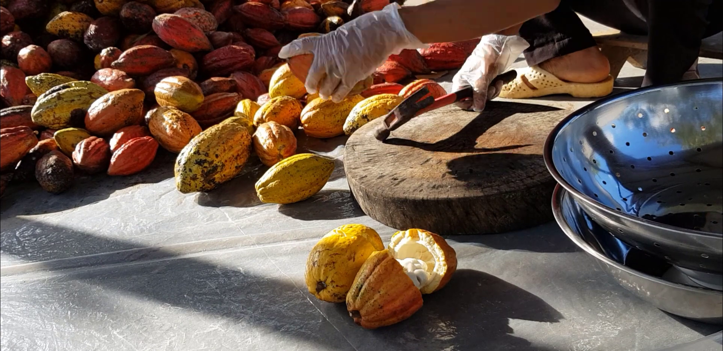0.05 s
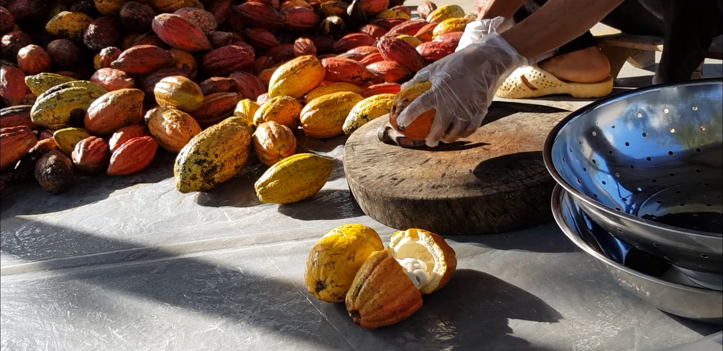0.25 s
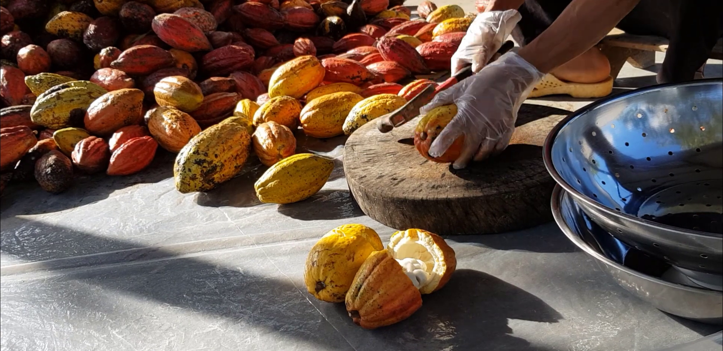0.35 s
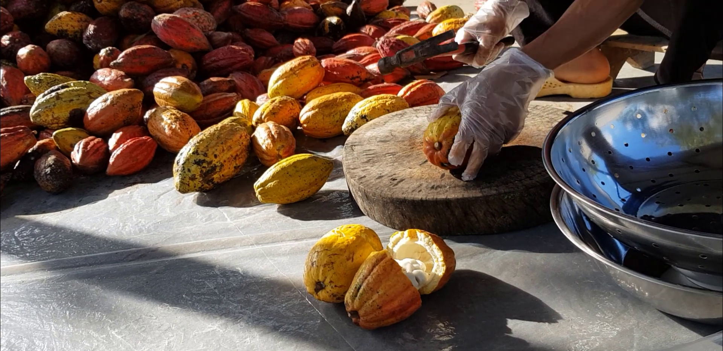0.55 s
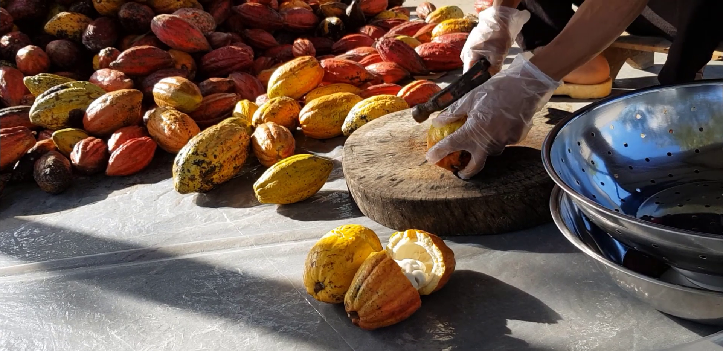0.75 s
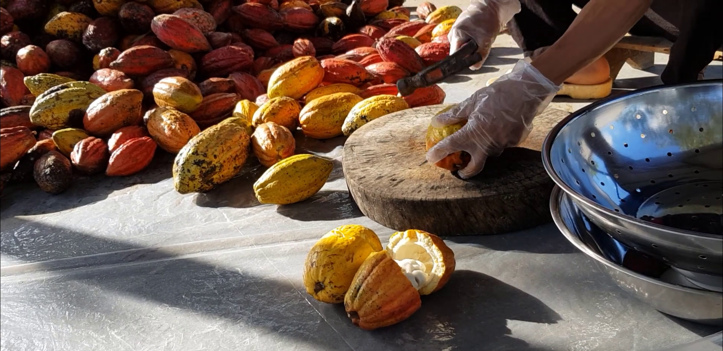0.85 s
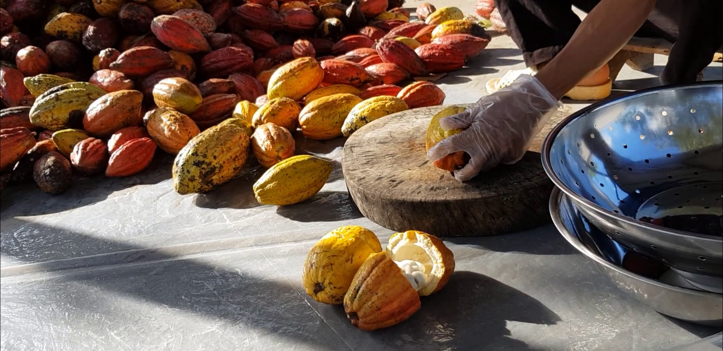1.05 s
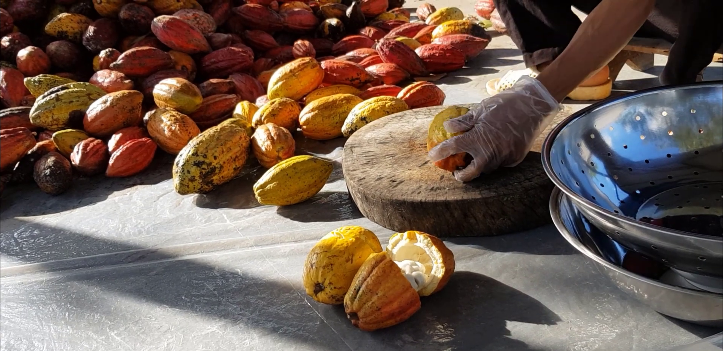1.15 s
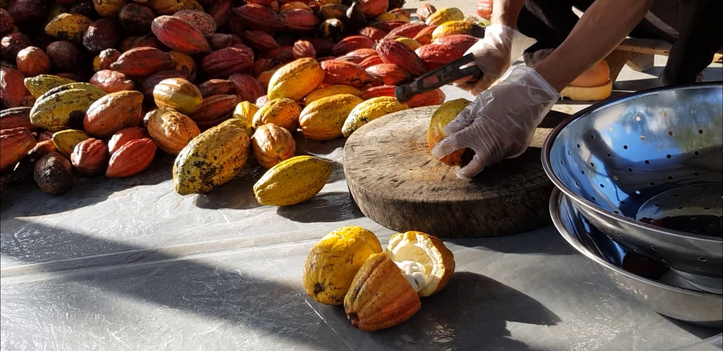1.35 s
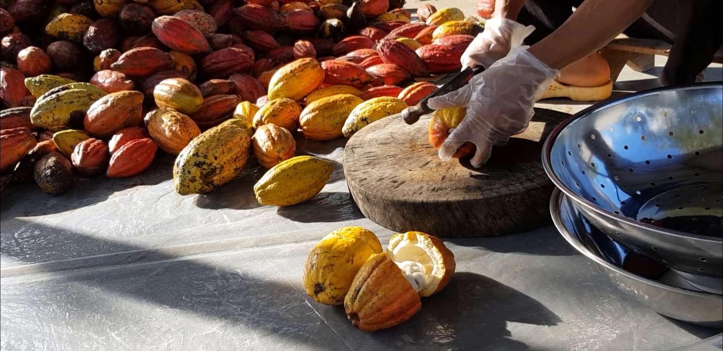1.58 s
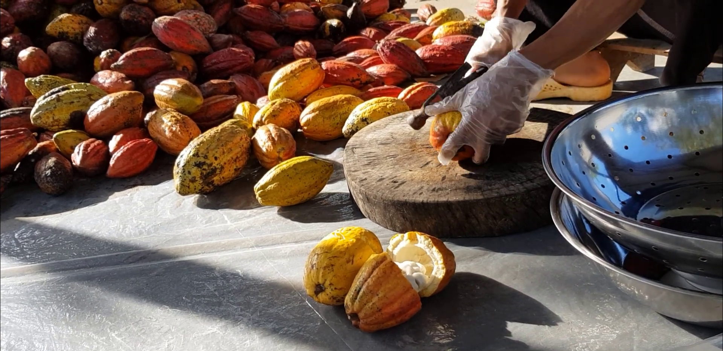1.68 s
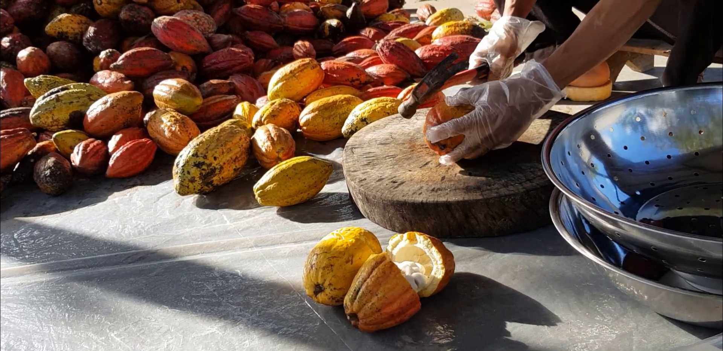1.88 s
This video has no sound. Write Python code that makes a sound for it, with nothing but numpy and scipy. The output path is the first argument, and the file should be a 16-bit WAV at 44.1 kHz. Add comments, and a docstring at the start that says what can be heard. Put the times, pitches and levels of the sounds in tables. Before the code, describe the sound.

One sharp, crunching blow splits a cacao pod on a wooden block, after a hollow knock and dull bumps; low thuds, faint steel ringing and a short room tail follow, heard close and slightly right over rustling hiss and low drone.

```python
"""Cacao pod split on a chopping block

A cacao pod is knocked down on a thick wooden block, bumps as it is turned, then one hard blow splits its husk.
Short contact pushes set damped modes ringing; the tears and scuffs are short bursts of uneven noise.
The blow also leaves nearby steel ringing faintly. A small, boomy work space answers as a decaying noise tail.
Behind lie an uneven hiss, air, hum, rumble and a low drone that sets in part-way. The block is a little right."""
import sys
import numpy as np
from scipy import signal
from scipy.fft import rfft, irfft
from scipy.io import wavfile
from scipy.ndimage import uniform_filter1d

SR = 44100
rng = np.random.default_rng(int(sys.argv[2]) if len(sys.argv) > 2 else 0)


def to_wav(sig):
    """Store sig (one row per channel, or 1-D mono) as 16-bit WAV at the path in sys.argv[1].

    Samples outside -1..1 are clipped; the rate is SR.
    """
    pcm = np.clip(np.atleast_2d(sig), -1, 1) * 32767
    pcm = np.round(pcm).astype(np.int16)
    wavfile.write(sys.argv[1], SR, pcm.T)  # frames by channels


N = 83790
T = np.arange(N) / SR
HZ = np.fft.rfftfreq(N, 1 / SR)
BLOW_S = 1.3844  # head meets husk
WORK_PAN_DB, KNOCK_PAN_DB = -2.5, -1.5  # left relative to right


def undb(db):
    """Decibels to gain."""
    return 10 ** (np.asarray(db) / 20)


def curve(rows):
    """Gain over time from (time_s, level_db) points."""
    return undb(np.interp(T, *np.array(rows).T))


def over_hz(rows):
    """A table read on a log-frequency axis."""
    hz, value = np.array(rows).T
    return np.interp(np.log(HZ + 1), np.log(hz), value)


def colour(x, rows):
    """Filter by (freq_hz, gain_db) points, falling steeply outside them; white noise keeps its power."""
    low_fall = np.minimum(HZ / rows[0][0], 1) ** 2
    high_fall = np.minimum(rows[-1][0] / (HZ + 1), 1) ** 4
    gain = undb(over_hz(rows)) * low_fall * high_fall
    return irfft(rfft(x) * gain / np.sqrt(np.mean(gain ** 2)), N)


def convolve(x, response):
    """Play a sound through a response."""
    return signal.fftconvolve(np.atleast_2d(x), np.atleast_2d(response), axes=1)[:, :N]


def walk(rate_hz):
    """Random values at the given rate joined by straight ramps, spread near 1."""
    step = max(int(SR / rate_hz), 1)
    held = np.repeat(rng.standard_normal(N // step + 1), step)
    return uniform_filter1d(held, step)[:N]


def diffuse():
    """Noise from all around: alike in both channels in the bass, unrelated in the treble."""
    mid, side = rfft(rng.standard_normal((2, N)))
    alike = 1 / (1 + (HZ / 710) ** 2)
    mid = mid * np.sqrt((1 + alike) / 2)
    side = np.array([[1], [-1]]) * side * np.sqrt((1 - alike) / 2)
    return irfft(mid + side, N)


def from_right(x, lag_s=.0001, pan_db=WORK_PAN_DB):
    """A source to the right: the left channel hears it later and weaker."""
    x = np.ravel(x)
    late = irfft(rfft(x) * np.exp(-2j * np.pi * HZ * lag_s), N)
    return np.array([late * undb(pan_db / 2), x * undb(-pan_db / 2)])


def t60_decay(age_s, t60_s):
    """Exponential fade by 60 dB in t60_s."""
    return np.exp(-np.log(1000) * age_s / t60_s)


def ringing(modes):
    """Sum of damped modes (freq_hz, level_db, t60_s); neighbours swing in opposite directions."""
    ring = np.zeros(N)
    for k, (hz, db, t60_s) in enumerate(modes):
        ring += (-1) ** k * undb(db) * np.sin(2 * np.pi * hz * T) * t60_decay(T, t60_s)
    return ring


def strike(contacts, ring):
    """Each contact is a short push, duller the longer it lasts, that sets a body ringing."""
    force = np.zeros(N)
    for start_s, db, contact_ms in contacts:
        age = np.maximum(T - start_s, 0) / (contact_ms / 1000) * 4  # push peaks at a quarter of contact_ms
        push = age * np.exp(-age)
        force -= undb(db) * push / push.sum()
    return convolve(force, ring)


def crackle(bursts, spectrum, grain_db):
    """Decaying bursts of uneven noise, each scaled to a set energy for its length."""
    grain = undb(grain_db * np.clip(walk(2500), -2, 2))
    clicks = colour(rng.standard_normal(N) * grain, spectrum)
    out = np.zeros(N)
    for start_s, db, decay_s in bursts:
        fade = (T >= start_s) * np.exp(-np.maximum(T - start_s, 0) / decay_s)
        burst = fade * clicks
        out += undb(db) * burst * np.sqrt(np.sum(fade ** 2) / np.sum(burst ** 2))
    return out


def blow():
    """The blow rings pod, tool and block together and crushes the wet flesh, a dead noise crunch."""
    # head meets husk, husk gives, pod hits block: start_s, level_db, contact_ms
    blows = [(BLOW_S, -4, 0.08), (1.3880, 4, .2), (1.3957, 0, 0.43), (1.4032, -0.5, 0.21)]
    # struck pod, tool and block: freq_hz, level_db, t60_s
    blow_modes = [(166.4, -31.5, 0.24), (224, -27.5, 0.076), (369.3, -30, .16), (452, -27.5, 0.18),
                  (561.3, -26.5, .17), (744, -24, 0.061), (837, -27, 0.094), (917, -32.5, .1),
                  (1231, -29, 0.13), (1420, -31, 0.082), (1570.5, -30.5, 0.098), (2235, -35, 0.073),
                  (2920, -29, 0.1), (3500, -39, 0.052)]
    # crunch of the flesh: freq_hz, gain_db
    flesh_colour = [(200, -3), (450, 3), (900, 8), (1100, -11), (1500, -9), (2200, 10), (5000, -3),
                    (9000, -34)]
    flesh_db, flesh_t60_s = -21.5, 0.035
    flesh = colour(rng.standard_normal(N), flesh_colour) * undb(flesh_db) * t60_decay(T, flesh_t60_s)
    return strike(blows, ringing(blow_modes) + flesh)


def husk_cracks():
    """The husk tears in brief noise bursts."""
    # tears: start_s, level_db, decay_s
    tears = [(BLOW_S, -16.5, 0.00053), (1.3866, -8.5, 0.00049), (1.3874, -12, 0.00063),
             (1.3881, -16, 0.00063), (1.4015, -29, 0.013)]
    # their spectrum: freq_hz, gain_db
    tear_colour = [(300, 6.5), (1000, 3), (2000, -1.5), (3300, -0.5), (5000, -7), (7000, -10),
                   (10000, -13.5), (12500, -8), (16000, -17.5)]
    return crackle(tears, tear_colour, grain_db=2.5)


def pod_knock():
    """The whole pod rings hollow on the wood; its rough skin scuffs then and, faintly, again as it is turned."""
    # pod on block: start_s, level_db, contact_ms
    knocks = [(0.2321, -5.5, 0.14), (0.2328, 1, 0.21)]
    # hollow pod: freq_hz, level_db, t60_s
    pod_modes = [(241, -27.5, 0.044), (335, -24.5, 0.025), (459.6, -18.5, 0.061), (536, -21, 0.12),
                 (620, -16.5, 0.072), (667, -15, 0.064), (813, -19.5, 0.076), (1371, -17.5, 0.06),
                 (1455, -14.5, 0.048), (1618, -15, 0.036), (2170, -26, 0.018), (2428, -39, 0.17),
                 (3250, -40, .02)]
    # skin scuffs, landing and turning: start_s, level_db, decay_s
    scuffs = [(0.2325, -18.5, 0.013), (0.783, -41, 0.0084)]
    # their spectrum: freq_hz, gain_db
    scuff_colour = [(280, -9), (450, 1.5), (800, 0), (1100, -7.5), (1800, -8.5), (2500, -15.5), (4000, -28)]
    return strike(knocks, ringing(pod_modes)) + crackle(scuffs, scuff_colour, grain_db=2)


def pod_bumps():
    """Soft, longer contacts as the pod is turned; the hand damps its ring."""
    # bumps: start_s, level_db, contact_ms
    bumps = [(0.7672, -5, 0.37), (0.7705, -2.5, 1.43), (0.7850, 2.5, 1.24), (0.7935, 0.5, 1.28)]
    # pod damped in the hand: freq_hz, level_db, t60_s
    bump_modes = [(270, -25.5, 0.022), (444, -30, 0.049), (527, -35, 0.044), (665, -33, 0.041),
                  (880, -30, 0.041), (1350, -30, 0.014)]
    return strike(bumps, ringing(bump_modes))


def block_thuds():
    """The block rocks on the floor; slow pushes excite its low boom."""
    # block on floor: start_s, level_db, contact_ms
    thuds = [(0.233, -6, 3.7), (0.445, -13, 2.7), (0.548, -26, 9.6), (0.774, -4.5, 1.56),
             (0.842, -11.5, 1.8), (1.389, 2.5, 1.6), (1.512, -9, 3.5), (1.583, -16, 4.8),
             (1.695, -10.5, 11)]
    # boom of the block: freq_hz, level_db, t60_s
    block_modes = [(58.5, -34.5, 0.11), (88, -32.5, 0.13), (110.5, -27, 0.18), (131.5, -29.5, 0.21),
                   (166.6, -21.5, 0.039)]
    return strike(thuds, ringing(block_modes))


def steel():
    """Steel shaken by the blow rings faintly on two close, beating modes."""
    mode_hz, beat_hz, t60_s = 863, 3.67, 1.7
    first_db, second_rel_db = -53, -6
    age_s = np.maximum(T - BLOW_S, 0)
    first = np.sin(2 * np.pi * mode_hz * age_s)
    second = undb(second_rel_db) * np.sin(2 * np.pi * (mode_hz + beat_hz) * age_s)
    return undb(first_db) * (first + second) * t60_decay(age_s, t60_s)


def room_response():
    """A dense, spectrally even noise tail after a short gap; the bass lingers."""
    # decay by band: centre_hz, t60_s
    room_t60 = [(60, 0.51), (130, .42), (300, .23), (700, 0.21), (1500, 0.22), (4000, 0.18), (15000, 0.13)]
    gap_s, build_s, even_hz = 0.0062, 0.0023, 38.7
    noise, spectrum = rfft(diffuse()), 0
    age_s = np.maximum(T - gap_s, 0)
    centres_hz = [hz for hz, _ in room_t60]
    for hz, t60_s in room_t60:
        fade = (1 - np.exp(-age_s / build_s)) * undb(-60 * age_s / t60_s)
        share = over_hz([(c, float(c == hz)) for c in centres_hz])  # overlapping bands
        band = irfft(noise * share, N) * fade
        spectrum = spectrum + rfft(band) / np.sqrt(np.sum(fade ** 2))
    power = np.mean(np.abs(spectrum) ** 2, axis=0)
    for _ in range(2):
        power = uniform_filter1d(power, int(even_hz / HZ[1]))
    return irfft(spectrum / np.sqrt(power), N) * (age_s > 0)


def hiss(flicker_db=2.0, direct_db=-5, spread_db=-2):
    """A rustling hiss, part diffuse and part from the right, that swells, sinks and flickers."""
    # spectrum: freq_hz, gain_db
    hiss_colour = [(800, -6.5), (1500, -5), (2400, -2.5), (3000, 0.5), (4900, 1), (6300, -2), (7300, .5),
                   (10000, -1.5), (13000, 2), (15000, -4), (16000, -1)]
    # swell: time_s, level_db
    hiss_level = [(0, -50.5), (0.12, -46), (0.21, -43.5), (0.35, -53.5), (0.43, -43.5), (0.49, -50),
                  (0.55, -46.5), (0.6, -50.5), (0.67, -45), (0.73, -49.5), (0.79, -48.5), (0.93, -56.5),
                  (1.1, -51), (1.22, -54), (1.3, -52.5), (1.55, -53.5), (1.78, -54), (1.9, -53)]
    direct = from_right(rng.standard_normal(N), lag_s=.00014, pan_db=-8.5)
    noise = undb(spread_db) * diffuse() + undb(direct_db) * direct
    return colour(noise, hiss_colour) * curve(hiss_level) * undb(flicker_db * walk(90))


def air():
    """Still air: diffuse noise, strongest in the bass."""
    # spectrum: freq_hz, gain_db
    air_colour = [(35, -6), (79, 2.5), (124, 1), (215, -7), (280, -8.5), (600, -20.5), (880, -14),
                  (1100, -25), (1460, -25.5), (2500, -39)]
    # time_s, level_db
    air_level = [(0, -53.5), (0.7, -55.5), (1.0, -56), (1.3, -57), (1.6, -50.5), (1.9, -58)]
    return colour(diffuse(), air_colour) * curve(air_level)


def rumble():
    """Low diffuse noise that comes and goes."""
    # spectrum: freq_hz, gain_db
    rumble_colour = [(25, -42), (55, -1), (90, 8.5), (120, -3), (170, -13.5), (400, -54)]
    # time_s, level_db
    rumble_level = [(0, -82), (0.75, -56), (0.88, -48), (1.15, -56.5), (1.38, -69), (1.52, -44.5),
                    (1.9, -49.5)]
    return colour(diffuse(), rumble_colour) * curve(rumble_level)


def drone():
    """A low sine with slightly wavering pitch, like a distant engine, that sets in part-way."""
    # time_s, level_db (rms)
    drone_level = [(0, -81), (0.59, -74), (0.62, -48), (0.8, -43.5), (1.35, -42.5), (1.55, -47.5),
                   (1.68, -51), (1.9, -48.5)]
    pitch_hz = 62.4 * (1 + .004 * walk(8.4))
    return np.sqrt(2) * np.sin(2 * np.pi * np.cumsum(pitch_hz) / SR) * curve(drone_level)


def hum():
    """A faint machine hum: a sine of steady pitch, its level drifting a few dB."""
    pitch_hz, mean_db, drift_db = 208.4, -65.5, 2.6
    return np.sqrt(2) * np.sin(2 * np.pi * pitch_hz * T) * undb(mean_db + drift_db * walk(4.87))


def background():
    """Air, rumble, drone and hum, slightly stronger on the right."""
    return (air() + rumble() + drone() + hum()) * undb(np.array([[-.8], [.8]]))


def scene():
    """Every contact is heard directly and by way of the room; steel and background are heard without it."""
    room = room_response()

    def heard(x, room_db, pan_db=WORK_PAN_DB):
        """Direct sound plus room tail."""
        return from_right(x, pan_db=pan_db) + undb(room_db) * convolve(x, room)

    work = heard(blow(), -4)
    work = work + heard(husk_cracks(), -0.5)
    work = work + heard(pod_knock(), -5.5, KNOCK_PAN_DB)
    work = work + heard(pod_bumps(), -12)
    work = work + heard(block_thuds(), -6)
    return work + from_right(steel()) + hiss() + background()


def record(dry):
    """The recorder thins the deepest bass and cuts the top steeply."""
    low_cut_hz, top_hz = 34.7, 15800
    dry = signal.sosfilt(signal.butter(2, low_cut_hz, "high", fs=SR, output="sos"), dry)
    return signal.sosfilt(signal.ellip(10, .2, 80, top_hz, fs=SR, output="sos"), dry)


dry = scene()
out = record(dry)
to_wav(out)
```